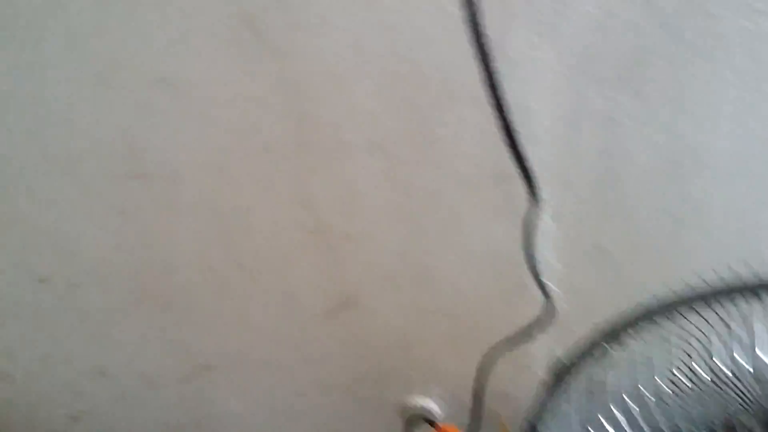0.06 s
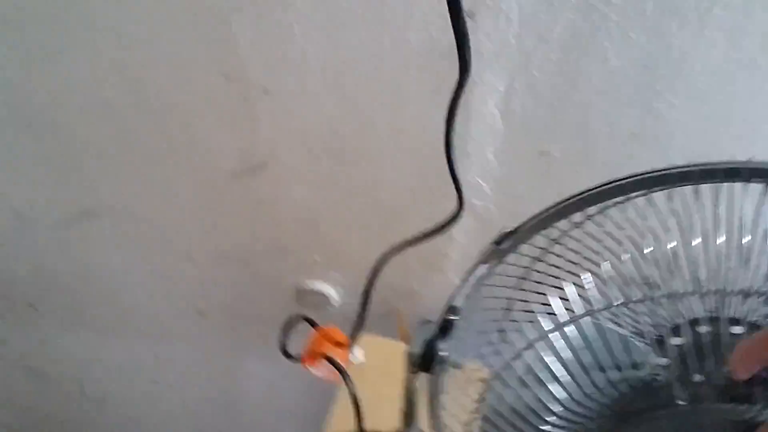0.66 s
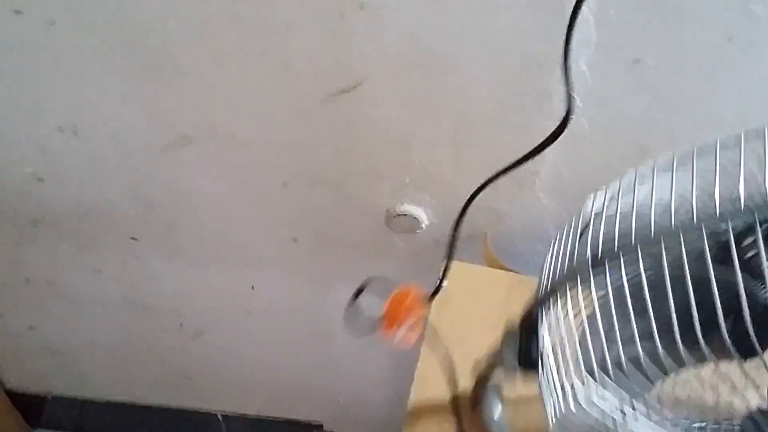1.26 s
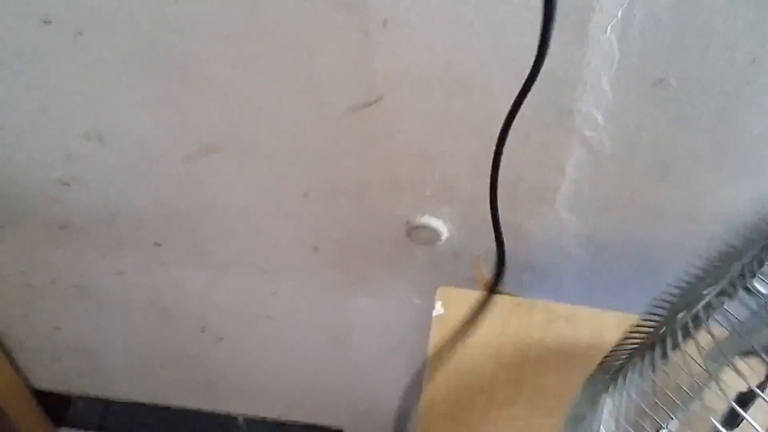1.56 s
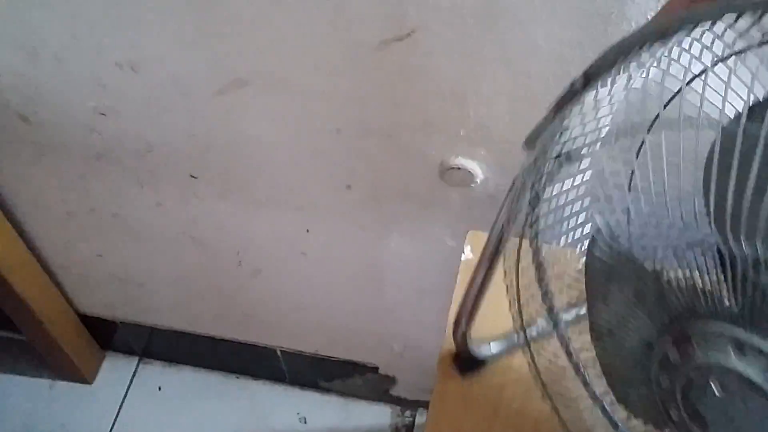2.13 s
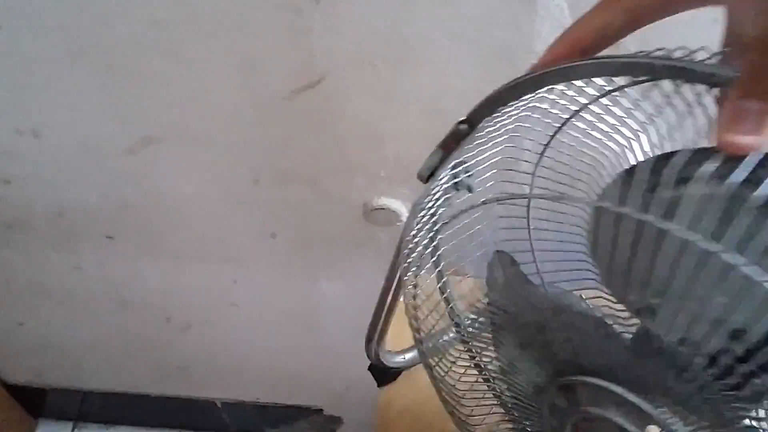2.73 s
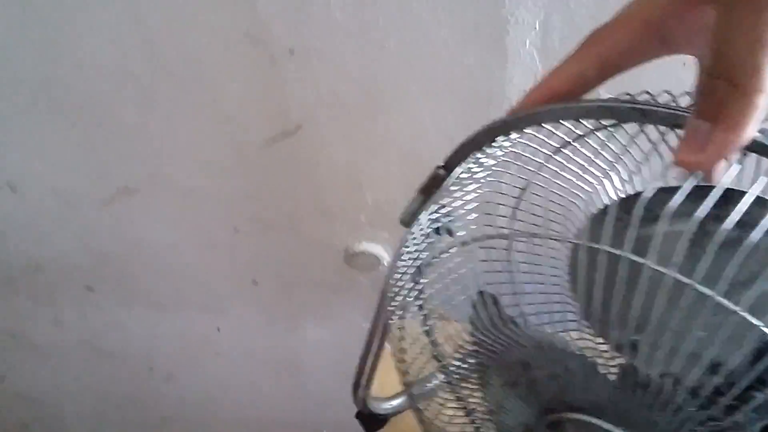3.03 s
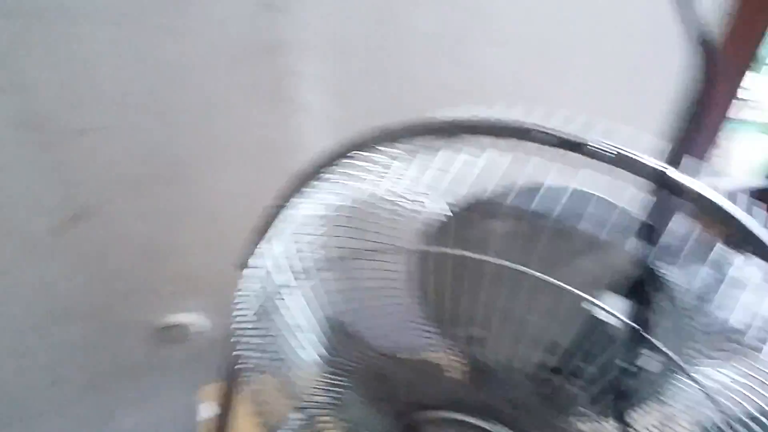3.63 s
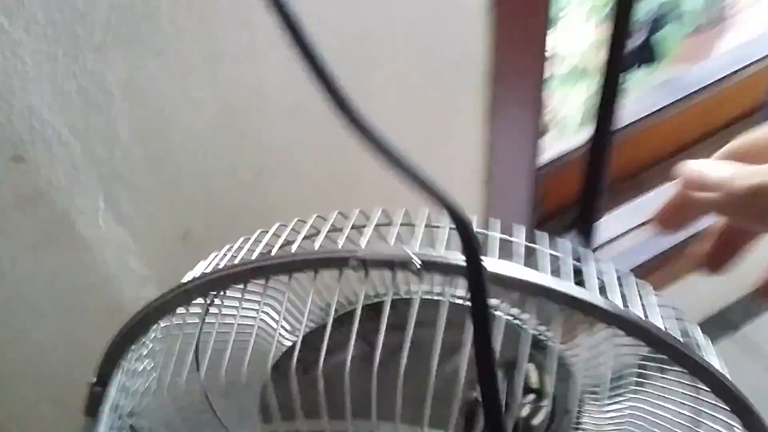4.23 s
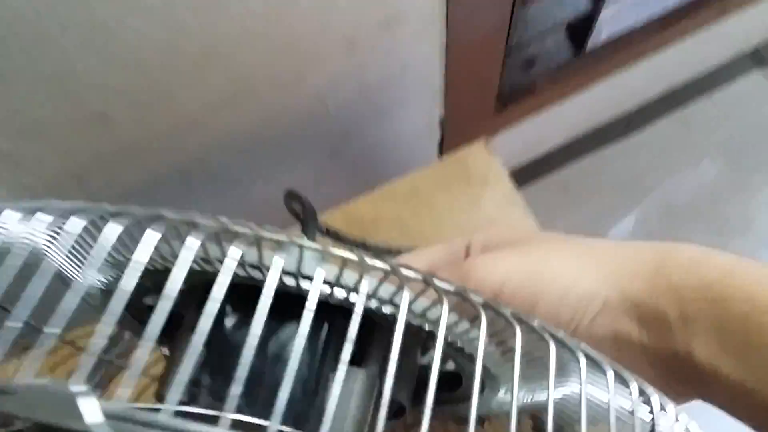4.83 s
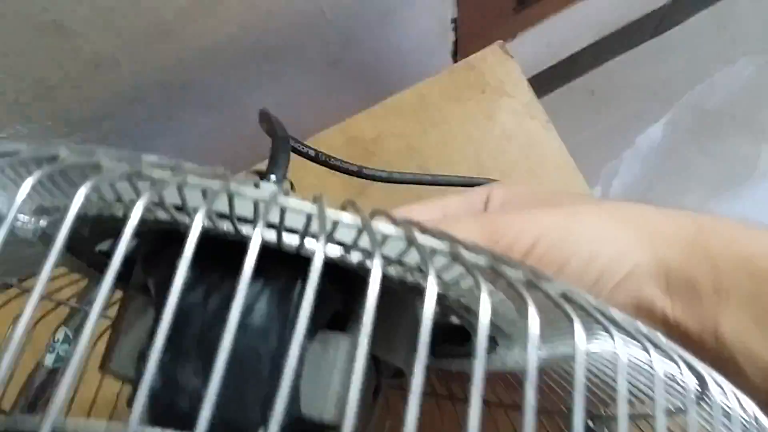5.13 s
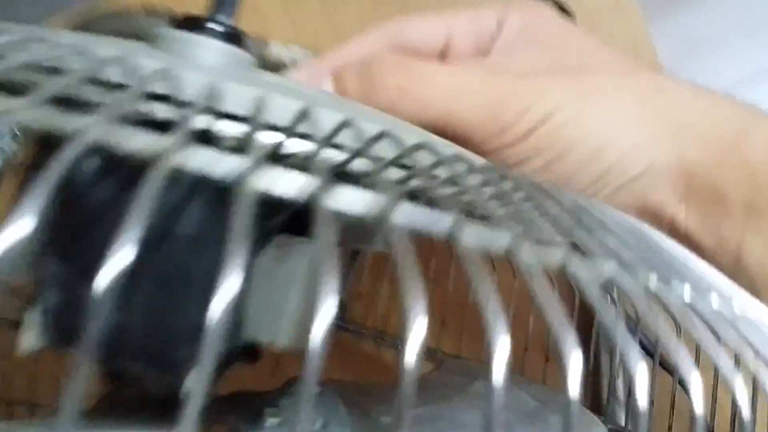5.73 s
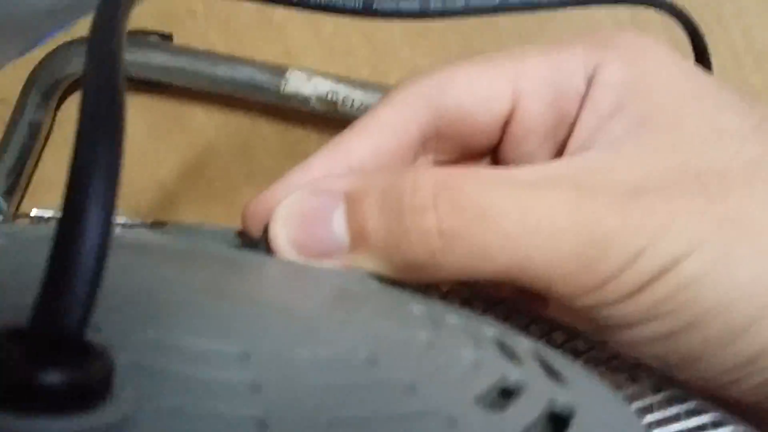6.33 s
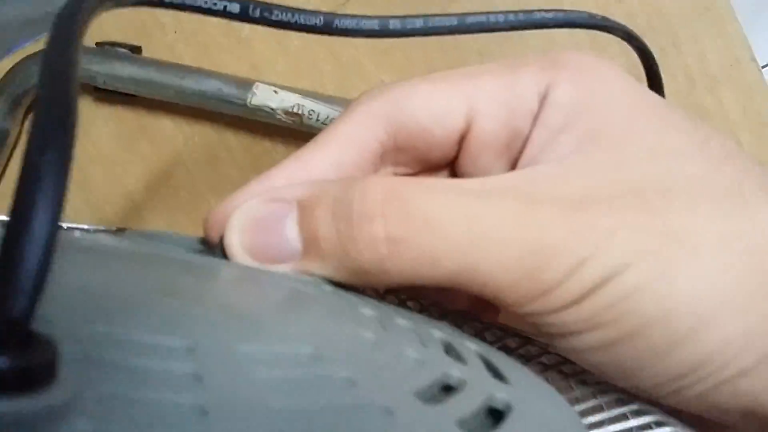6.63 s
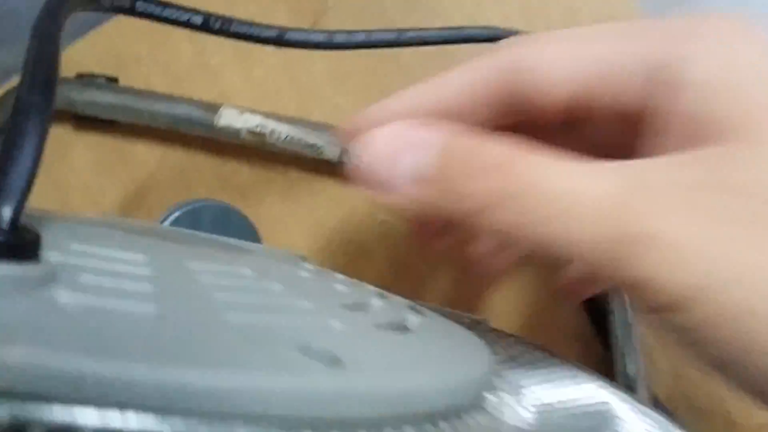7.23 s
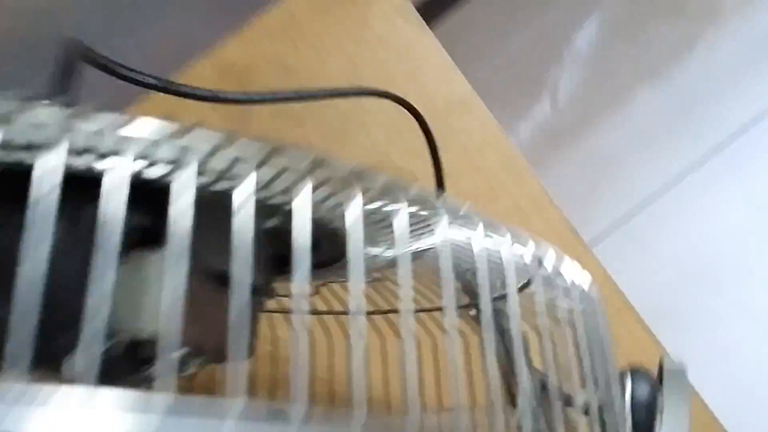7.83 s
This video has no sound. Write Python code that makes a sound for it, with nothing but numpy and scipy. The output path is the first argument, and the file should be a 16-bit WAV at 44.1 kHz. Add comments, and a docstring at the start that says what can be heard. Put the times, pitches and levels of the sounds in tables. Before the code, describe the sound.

In a small room with a soft hiss of air, a hand turns a wire-grille desk fan on a wooden table, close to the microphone. The grip rumbles, the stand drags, and skin brushes the guard with thin squeals. The wires clack now and then and the stand thuds on the table top. Near the end a rotary switch ticks and snaps over, the steel rings briefly, and a very faint hum begins.

```python
"""A wire-grille desk fan is turned round by hand on a wooden table in a small room.
From the start, over a soft hiss of air, the grip rumbles, the stand drags, skin and sleeve brush
the guard and its wires clack. Soon the skin squeals thinly and the stand bumps on the table top.
Near the end the fingers turn the rotary switch: it ticks, snaps over and sets the steel ringing,
and a faint hum sets in."""
import sys
import numpy as np
from scipy import signal
from scipy.fft import rfft, irfft, next_fast_len
from scipy.io import wavfile

SR = 44100
rng = np.random.default_rng(int(sys.argv[2]) if len(sys.argv) > 2 else 0)


def transcribe(signal):
    """Save signal, clipped to [-1, 1], as a 16-bit WAV file at the path in sys.argv[1]."""
    frames = np.atleast_2d(signal).T
    limited = np.clip(frames, -1, 1)
    pcm = np.round(limited * 32767).astype(np.int16)
    wavfile.write(sys.argv[1], SR, pcm)


N = 351388
TIME = np.arange(N) / SR
HIT = TIME[:SR // 2]   # half a second: the clock for one blow


def from_db(db):
    """Turn decibels into a factor to multiply by."""
    return 10 ** (np.asarray(db) / 20)


def rms_one(x):
    """Scale a signal so that its average strength (rms) is 1."""
    return x / np.sqrt(np.mean(x ** 2) + 1e-20)


def at_hz(points, hz):
    """Read between the rows of a table, with frequency spaced in octaves."""
    f, value = np.transpose(points)
    return np.interp(np.log(np.maximum(hz, 1)), np.log(f), value)


def add(out, s, sound):
    """Mix a sound in at s seconds."""
    i = int(round(s * SR))
    out[i:i + len(sound)] += sound[:len(out) - i]


def band(x, hz, kind, order=2):
    """Keep the lows, the highs or a band in between."""
    sos = signal.butter(order, np.clip(hz, 10, SR / 2 - 100), kind, fs=SR, output="sos")
    return signal.sosfilt(sos, x)


def colour(x, spectrum):
    """Give a noise a tone colour (its balance of low and high), at strength 1."""
    size = next_fast_len(len(x))
    gain = from_db(at_hz(spectrum, np.arange(size // 2 + 1) * SR / size))
    return rms_one(irfft(rfft(x, size) * gain, size)[:len(x)])


def drift(rate):
    """A random wander of strength 1 that turns about rate times a second."""
    knots = rng.standard_normal(4000)
    return rms_one(np.interp(TIME * rate, np.arange(len(knots)), knots))


def friction(size, grain_db):
    """Rubbing is countless tiny slips of uneven strength."""
    return rng.standard_normal(size) * from_db(grain_db * rng.standard_normal(size))


def moves(rows, attack_s, release_s, rest_db):
    """Loudness of hand moves over a resting level: each swells, holds and dies away."""
    power = from_db(rest_db) ** 2 + np.zeros(N)
    t = TIME[:2 * SR]
    for s, length_s, db in rows:
        swell = 1 - np.exp(-t / attack_s)
        fade = np.exp(-np.maximum(t - length_s, 0) / release_s)
        add(power, s, (from_db(db) * swell * fade) ** 2)
    return np.sqrt(power)


# tone colour of the room's air: f/Hz, relative level/dB
AIR_COLOUR = [(15, -35), (25, -8), (119, 1), (156, -8), (215, -1), (274, -11.5), (378, -12), (722, -15.5),
              (826, -15), (2230, -21), (3930, -25), (5880, -24.5), (7910, -26), (15500, -23.5)]
def air():
    """Still room air is a soft, steady noise."""
    return from_db(-60) * colour(rng.standard_normal(N), AIR_COLOUR)


# the hand's light touch between moves: t/s, relative level/dB
LIGHT_TOUCH = [(0, -63.5), (.45, -67), (2.0, -66.5), (3.7, -65.5), (4.2, -68), (5.0, -67), (5.5, -73.5),
               (6.6, -71.5), (7.5, -68.5), (7.97, -72.5)]
def touch_db():
    """The resting hand keeps rubbing a little: its level at every moment."""
    return np.interp(TIME, *np.transpose(LIGHT_TOUCH))


# tone colour of the rumbling grip: f/Hz, relative level/dB
GRIP_COLOUR = [(25, -24), (36, -11), (47, 4.5), (75, -8), (110, 2), (140, -6), (200, -3.5), (270, -11),
               (400, -26.5), (800, -33.5)]
# tone colour of the dragging stand: f/Hz, relative level/dB
DRAG_COLOUR = [(150, -7), (300, -2.5), (520, 2.5), (800, -1.5), (1200, -6), (2000, -9.5), (4000, -15),
               (9000, -37)]
# shoves that shift the fan: t/s, length/s, relative drag level/dB, relative rumble level/dB
FAN_SHOVES = [(0.587, .19, -57, -58), (0.823, .13, -67, -59), (1.16, 0.13, -58.5, -52.5),
              (1.35, 0.18, -54.5, -53), (1.578, 0.19, -61.5, -59), (2.09, 0.25, -63, -62),
              (2.35, .09, -58, -63), (2.54, 0.099, -63, -58), (2.763, 0.24, -59.5, -51),
              (3.13, 0.3, -58, -54.5), (3.91, 0.24, -64, -82), (4.405, .24, -75, -57),
              (4.86, 0.17, -60.5, -52.5), (6.12, .25, -74, -63), (6.86, .55, -69.5, -54.5)]
def shoves():
    """Shoving the fan makes the grip rumble and the stand drag over the table."""
    rows = np.array(FAN_SHOVES)
    attack_s, release_s = 0.024, 0.14
    drag = moves(rows[:, [0, 1, 2]], attack_s, release_s, rest_db=touch_db() + 2)
    grip = moves(rows[:, [0, 1, 3]], attack_s, release_s, rest_db=-59.5)
    rumble = from_db(-1) * grip * colour(rng.standard_normal(N), GRIP_COLOUR)
    flicker = from_db(-0.1 + 1.4 * drift(60))
    return rumble + flicker * drag * colour(friction(N, grain_db=4), DRAG_COLOUR)


# pitches at which the guard's wires ring: f/Hz, width/Hz, relative level/dB
WIRE_TONES = [(1413, 120, -1), (2510, 220, -3.5), (3600, 51, -17), (4060, 130, -19.5), (4500, 130, -2),
              (5470, 240, -3), (5990, 210, -0.5), (6350, 160, -1), (7400, 240, -6.5), (8800, 540, -7.5)]
def wires(scrape, ring_db):
    """A scrape plus the ringing that it stirs up in the wires."""
    rings = sum(from_db(db) * signal.lfilter(*signal.iirpeak(hz, hz / width_hz, fs=SR), scrape + 1e-18)
                for hz, width_hz, db in WIRE_TONES)
    return scrape + from_db(ring_db) * rings


# tone colour of the brushing: f/Hz, relative level/dB
BRUSH_COLOUR = [(700, -8.5), (1500, -9), (2500, -7), (3400, -4), (4700, -2.5), (5600, 0.5), (6650, 0),
                (8000, -7), (10500, -12), (15500, -21)]
# strokes over the guard: t/s, length/s, relative level/dB
HAND_STROKES = [(0.56, 0.099, -64), (0.69, 0.052, -61), (1.08, 0.14, -57), (1.185, 0.09, -49.5),
                (1.365, 0.11, -47.5), (1.58, .11, -54.5), (2.05, 0.11, -59), (2.29, 0.25, -61),
                (2.54, 0.43, -56), (3.15, 0.17, -57.5), (3.37, .11, -54.5), (3.92, 0.028, -53),
                (4.33, .06, -60), (4.56, 0.051, -54), (5.81, 0.031, -62.5), (6.33, 0.029, -63.5),
                (6.78, 0.34, -63), (7.15, 0.063, -52), (7.3, 0.06, -61)]
def brushing():
    """Skin and sleeve rub over the guard, and its wires ring along."""
    strokes = moves(HAND_STROKES, attack_s=0.011, release_s=0.098, rest_db=touch_db())
    rubbing = colour(friction(N, grain_db=5), BRUSH_COLOUR)
    flicker = from_db(-1 + 0.84 * drift(90))
    return flicker * strokes * rms_one(wires(rubbing, ring_db=-7))


# tone colour of a clack: f/Hz, relative level/dB
CLACK_COLOUR = [(350, -39), (700, -14.5), (1150, -5.5), (1700, -9), (3000, -7), (3900, -6), (4700, -6),
                (5500, -3.5), (6600, -1), (7600, -5.5), (10000, -9.5), (15500, -21)]
# clacks of hard parts on the fan: t/s, level/dB, rise/ms, decay/ms, body (gain below 1800 Hz)/dB, top (gain
# above 9500 Hz)/dB, favoured f/Hz
GUARD_CLACKS = [(0.029, -53.5, 2.8, 13, 6, -1, 6000), (0.358, -56.5, 5, 14, 6, -12, 5600),
                (0.6781, -29, 0.81, 0.61, 0.5, 0, 4700), (1.2118, -32, 2.6, 4.5, 8.5, -3, 2600),
                (2.13, -52, 3.3, 8, -10, -8, 6000), (2.789, -35.5, 0.66, 14, -1, 1, 6000),
                (2.858, -43, 1.3, 5, 4, -9, 6400), (2.873, -38.5, 1.6, 7.4, 0, -5, 1200),
                (2.9284, -36.5, 3.2, 12, -2, 0.5, 6200), (3.124, -51, 4.4, 12, 4, -4, 6000),
                (3.2142, -32.5, 0.39, 1.7, -2, -17, 6900), (3.232, -42, 1.5, 5.4, -3, -1, 5600),
                (3.247, -40, 1.2, 19, 6, -0.5, 4600), (3.954, -52, 3, 11, -9, 3, 6200),
                (4.34, -48.5, 2, 7, -11, -9, 6300), (4.557, -44.5, 3, 16, -2.5, -1.5, 6000),
                (4.74, -53, 5, 21, -7, -4, 6000), (5.225, -52.5, 12, 8, -2, -8, 5670),
                (5.3393, -25.5, 2.5, 3.3, 0.5, -2, 3930), (6.844, -29, 2.7, 24, 3, 3, 6500)]
def clacks():
    """Each clack is a brief, grainy knock of hard parts, and the guard's wires ring along."""
    out, ms = np.zeros(N), HIT * 1000
    for s, db, rise_ms, decay_ms, body_db, top_db, favoured_hz in GUARD_CLACKS:
        swell = np.minimum(ms / rise_ms, 1) * np.exp(-np.maximum(ms - rise_ms, 0) / decay_ms)
        tilt = [(1800, body_db), (3500, 0), (6800, 0), (9500, top_db)]
        spectrum = [(hz, level + at_hz(tilt, hz)) for hz, level in CLACK_COLOUR]
        chatter = colour(friction(len(HIT), grain_db=3.5), spectrum) * swell
        # the spot that is hit brings out a band round one pitch
        favoured = signal.lfilter(*signal.iirpeak(favoured_hz, Q=7.2, fs=SR), chatter + 1e-18)
        clack = wires(chatter + from_db(-2) * favoured, ring_db=-5.5)
        add(out, s, clack * from_db(db) * np.linalg.norm(swell) / np.linalg.norm(clack))
    return out + from_db(-10.5) * room(out)


# how long the room echoes: f/Hz, time to fade by 60 dB/s
ECHO_TIMES = [(150, 0.19), (600, 0.29), (2000, 0.27), (6000, 0.22), (14000, 0.17)]
def room(x, build_s=0.0042):
    """Echoes from near walls blur together; the highest ones die first."""
    edges_hz = np.geomspace(60, 17000, 10)
    tail = np.zeros(len(HIT))
    for low, high in zip(edges_hz, edges_hz[1:]):
        fade = np.exp(-np.log(1000) * HIT / at_hz(ECHO_TIMES, np.sqrt(low * high)))
        tail += band(rng.standard_normal(len(HIT)), [low, high], "band") * fade
    tail *= 1 - np.exp(-(HIT / build_s) ** 2)
    return signal.fftconvolve(x, tail / np.linalg.norm(tail))[:N]


# squeals of skin: t/s, length/s, f/Hz, pitch slide as a share of f, width/Hz, level/dB
SKIN_SQUEALS = [(0.61, 0.064, 806, -0.0046, 148, -55.5), (0.708, 0.054, 825, -0.0058, 150, -56),
                (1.33, 0.18, 7150, 0, 450, -59), (1.369, 0.41, 3460, 0, 130, -65.5),
                (2.543, 0.47, 6540, 0, 181.6, -59.5), (3.327, 0.066, 3200, 0.0076, 303, -60),
                (3.438, 0.136, 3200, -0.035, 305, -64), (4.568, .15, 5940, -0.0027, 248, -67)]
def squeals():
    """Skin sticks and slips, making thin, unsteady tones that swell and fade."""
    out = np.zeros(N)
    for s, length_s, hz, slide, width_hz, db in SKIN_SQUEALS:
        progress = np.linspace(0, 1, int(length_s * SR))
        cycles = np.cumsum(hz * (1 + slide * progress)) / SR
        waver = (drift(width_hz) + 1j * drift(width_hz))[:len(progress)]   # shakes level and pitch
        swell = np.sqrt(np.abs(np.sin(np.pi * progress)))
        add(out, s, from_db(db) * swell * np.real(waver * np.exp(2j * np.pi * cycles)))
    return out


def struck(tones, extra_db):
    """A struck object rings with its own fading tones; every second one starts upside down."""
    hz, db, fade_s = np.transpose(tones)
    gain = from_db(db + extra_db) * (-1) ** np.arange(len(db))
    fades = np.exp(-np.log(1000) * HIT / fade_s[:, None])
    return gain @ (fades * np.sin(2 * np.pi * hz[:, None] * HIT))


def blows(rows, tones, favour_db, crunch_db, crunch_s):
    """Each blow is a ring plus a short crunch of the surfaces; a softer contact dulls both."""
    out, hz = np.zeros(N), np.array(tones)[:, 0]
    for s, db, cutoff_hz, favoured_hz in rows:
        # the spot that is hit brings out the tones near one pitch
        near = np.exp(-(np.log2(hz / favoured_hz) / 0.12) ** 2)
        ring = struck(tones, favour_db * near + rng.standard_normal(len(hz)))
        noise = band(rng.standard_normal(len(HIT)), 0.83 * hz[0], "high", order=3)
        crunch = from_db(crunch_db) * noise * np.exp(-HIT / crunch_s)
        blow = band(ring / np.abs(ring).max() + crunch, cutoff_hz, "low")
        add(out, s, from_db(db) * blow / np.abs(blow).max())
    return out


# tones of the table top and stand: f/Hz, relative level/dB, time to fade by 60 dB/s
TABLE_TONES = [(96, -11.5, 0.13), (156, -19, 0.12), (204, -7, 0.11), (272, -2.5, 0.049), (316, -7, 0.096),
               (418, -4, 0.044), (499, -5, 0.055), (638, -21, 0.2), (821, -9, 0.047), (1172, -21, 0.057),
               (1590, -16.5, 0.056), (2210, -7, 0.033)]
# the stand bumping on the table: t/s, peak level/dB, dulled above f/Hz, favoured f/Hz
STAND_BUMPS = [(1.2151, -34, 800, 410), (2.2615, -39.5, 350, 230), (2.763, -36.5, 450, 380),
               (2.8526, -24, 397, 266), (2.8711, -28, 1110, 857), (2.914, -36, 600, 215),
               (3.2148, -22.5, 664, 290.4), (3.2691, -23.5, 900, 264), (6.852, -38, 800, 650),
               (6.91, -46, 650, 447)]
def bumps():
    """Padded feet thud on the table top; the second lands later, weaker and duller."""
    second_foot = [(s + 0.012, db - 11.5, cutoff_hz * 0.72, favoured_hz)
                   for s, db, cutoff_hz, favoured_hz in STAND_BUMPS]
    thuds = blows(STAND_BUMPS + second_foot, TABLE_TONES, favour_db=11, crunch_db=1, crunch_s=0.02)
    return thuds + from_db(-10.5) * room(thuds)


# tones of the plastic switch case: f/Hz, relative level/dB, time to fade by 60 dB/s
CASE_TONES = [(1410, -11.5, 0.011), (1690, -10, 0.011), (2020, -13.5, .01), (3180, -8.5, 0.0043),
              (3910, -2.5, 0.014), (5190, 3.5, 0.006), (6150, 3, .01), (6770, 2.5, 0.01),
              (7750, 0.5, 0.011), (8840, 0.5, .007), (10200, 1, 0.0065), (11940, 0, .004),
              (14800, -7, .003)]
# the switch riding over its notch: t/s, relative level/dB, dulled above f/Hz, favoured f/Hz
SWITCH_TICKS = [(6.6767, -26.5, 3360, 1440), (6.7412, -31.5, 3200, 1400), (6.7815, -40.5, 3000, 1700),
                (6.7853, -44, 1500, 1700), (7.021, -46, 1400, 1700), (7.090, -45, 2290, 1400)]
# the spring lets go, the contact slams home, the knob hits its stop:
# t/s, relative level/dB, dulled above f/Hz, favoured f/Hz
SWITCH_SNAP = [(6.842, -11.5, 12000, 10300), (6.843, -8.5, 9000, 6120), (6.844, -2.5, 14500, 7660),
               (6.8450, -13.5, 1920, 1680)]
def switch():
    """The turning switch knocks on its case: soft ticks and one hard snap."""
    ticks = blows(SWITCH_TICKS, CASE_TONES, favour_db=9, crunch_db=-13.5, crunch_s=0.0052)
    snap = blows(SWITCH_SNAP, CASE_TONES, favour_db=5.5, crunch_db=-18.5, crunch_s=0.0021)
    clicks = band(ticks + snap, 530, "high")   # only the clicks' upper range is kept; their bass is removed
    return clicks + from_db(-13.5) * room(clicks)


# tones of the fan's hum: f/Hz, level/dB
HUM_TONES = [(108, -68), (216, -80)]
def hum():
    """A faint, wavering hum fades in once the switch has closed."""
    fade_in = np.clip((TIME - SWITCH_SNAP[0][0]) / 0.05, 0, 1)
    out = np.zeros(N)
    for hz, db in HUM_TONES:
        height = np.sqrt(2) * from_db(db + 1.9 * drift(6))
        out += height * np.sin(2 * np.pi * hz * TIME + 0.77 * drift(5))
    return fade_in * out


# tones of the steel wires and spring: f/Hz, relative level/dB, time to fade by 60 dB/s
STEEL_TONES = [(1350, -12.5, 0.16), (2192, -11.5, 0.23), (2474, -18.5, 0.27), (2554, -17.5, .38),
               (4310, -9, .14), (4340, 3, 0.15), (4870, -15, .2), (5070, -20, .2), (6057, -18, 0.21),
               (6350, -8, .23), (6360, -12, 0.15), (7700, -15, .15), (7768, -12, .11), (8592, -22, .16),
               (10240, -19, .15)]
def steel_ring(spread_s=0.007):
    """The snap's last blow sets the steel ringing; it takes a moment to spread into the guard."""
    out = np.zeros(N)
    swell = 1 - np.exp(-HIT / spread_s)
    add(out, SWITCH_SNAP[-1][0], from_db(-26) * swell * struck(STEEL_TONES, extra_db=0))
    return out


def scene():
    """All the sounds meet at one microphone."""
    handling = shoves() + brushing() + clacks() + squeals() + bumps()
    return (air() + handling + switch() + hum() + steel_ring())[None]


def record(dry):
    """The microphone drops the deepest bass, and the highest treble is cut."""
    bass_cut_hz, treble_cut_hz = 39, 15900
    thinned = band(dry, bass_cut_hz, "high", order=12)
    return signal.sosfilt(signal.ellip(10, .1, 80, treble_cut_hz, fs=SR, output="sos"), thinned)


dry = scene()
out = record(dry)
transcribe(out)
```